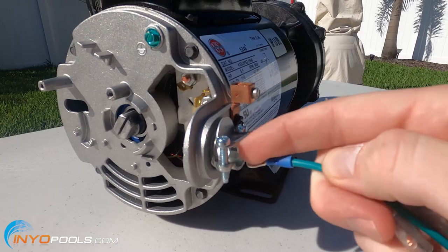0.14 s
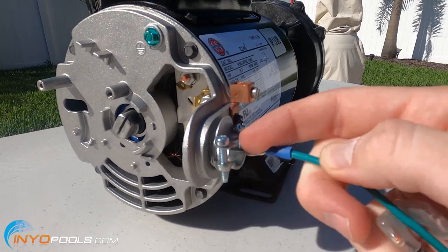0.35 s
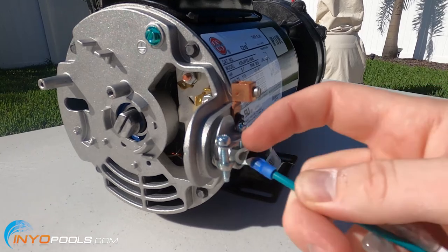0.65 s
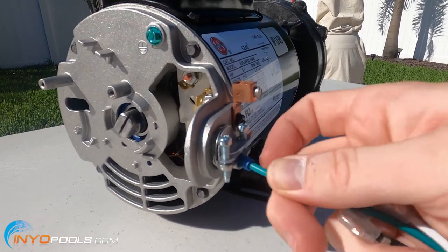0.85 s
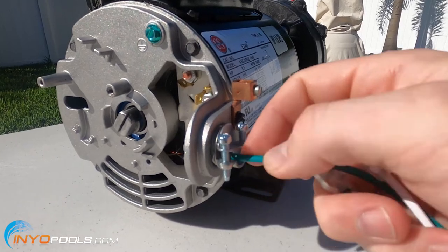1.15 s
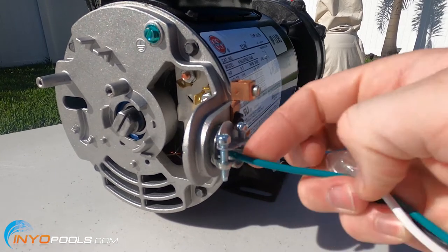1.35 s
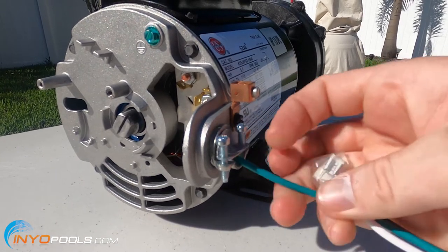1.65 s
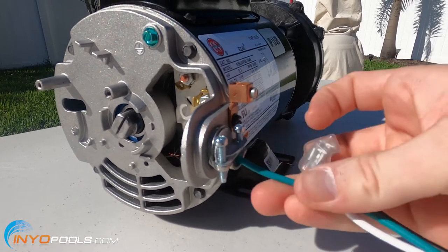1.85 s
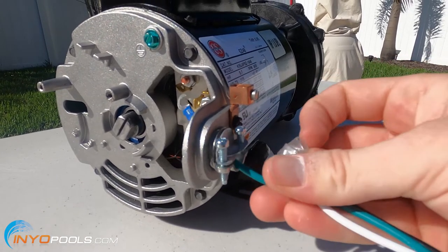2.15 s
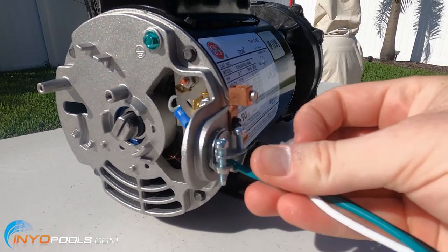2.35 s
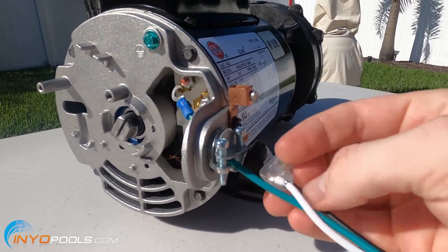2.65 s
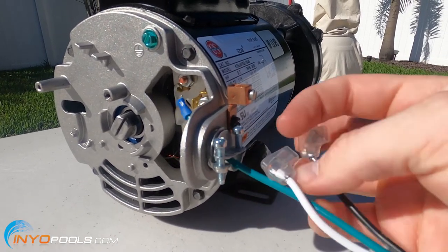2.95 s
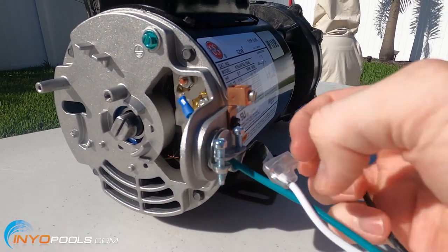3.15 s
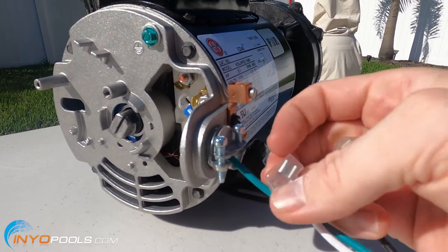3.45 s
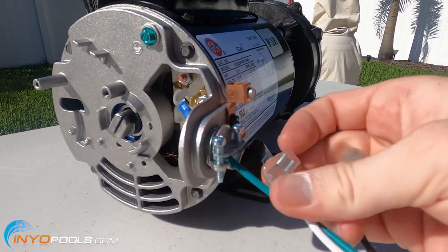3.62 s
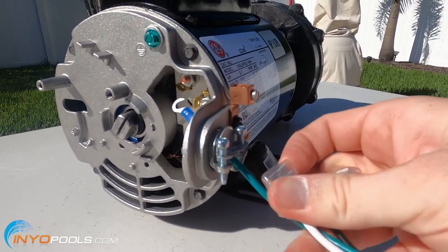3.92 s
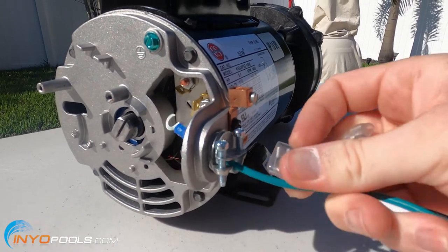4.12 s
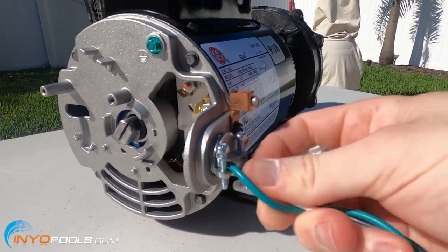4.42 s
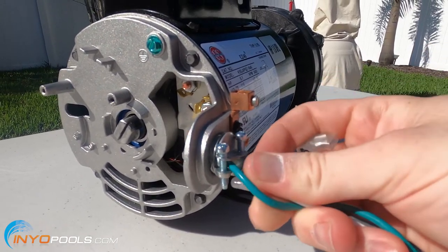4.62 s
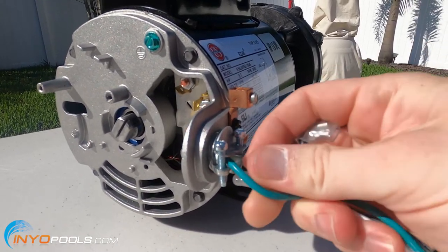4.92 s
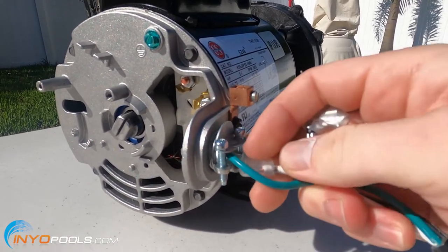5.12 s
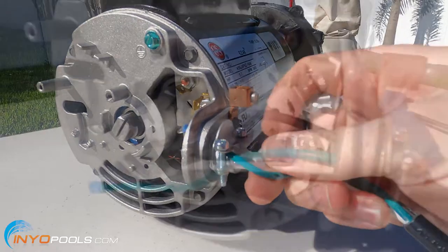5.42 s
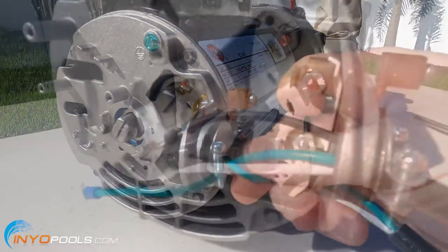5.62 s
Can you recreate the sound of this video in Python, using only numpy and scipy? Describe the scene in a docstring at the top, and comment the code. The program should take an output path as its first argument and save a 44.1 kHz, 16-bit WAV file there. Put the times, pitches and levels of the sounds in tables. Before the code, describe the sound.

Small metal terminals on wires click, scrape and rattle against a metal fitting outdoors, with faint bright pings over a low machine hum.

```python
"""Wires with crimp terminals are pushed through a steel conduit fitting on a cast motor housing, out of doors.
Each contact is a stutter of tiny impacts that rings the housing modes; the sliding wire ticks and rustles.
The metal sound shakes the loose lock nut, which also rings out in separate struck pings, mostly along with
contacts; table and hands scatter echoes. Behind this a distant machine hums and whines from sine waves, with
dull bumps, mostly low, and shaped noise for the low outdoor rumble, a drone and a soft hiss."""
import sys
import numpy as np
from scipy import signal
from scipy.fft import rfft, irfft, next_fast_len
from scipy.io import wavfile
from scipy.ndimage import uniform_filter1d, map_coordinates

SR = 44100
rng = np.random.default_rng(int(sys.argv[2]) if len(sys.argv) > 2 else 0)


def inscribe(sig):
    """Save sig as 16-bit PCM at rate SR to the path in sys.argv[1].

    A 1-D sig is mono; a 2-D sig holds one channel per row.
    Samples are clipped to [-1, 1] before scaling.
    """
    pcm = np.round(np.clip(np.atleast_2d(sig).T, -1, 1) * 32767)
    wavfile.write(sys.argv[1], SR, pcm.astype(np.int16))


N = 254456  # samples


def amp(db):
    """Decibels to linear gain."""
    return 10 ** (np.asarray(db) / 20)


def unit(x):
    """Scale to an rms of 1."""
    return x / np.sqrt(np.mean(x ** 2) + 1e-20)


def along(points, hz):
    """Read (frequency [Hz], value) points on a log frequency axis."""
    f, v = np.transpose(points)
    return np.interp(np.log(hz + 1), np.log(f + 1), v)


def curves(rows):
    """One value per sample for each column after the time."""
    s, *cols = np.transpose(rows)
    return [np.interp(np.arange(N) / SR, s, c) for c in cols]


def wobble(rate):
    """A smooth random curve, rate knots a second."""
    knots = rng.standard_normal(int(N * rate / SR) + 4)
    return map_coordinates(knots, [np.arange(N) * rate / SR])


def filtered(x, response, spare=8192):
    """x times a complex response of frequency, with spare samples of room for the tail."""
    n = x.shape[-1]
    m = next_fast_len(n + int(spare))
    return irfft(rfft(x, m) * response(np.fft.rfftfreq(m, 1 / SR)), m)[..., :n]


def ringing(modes, f):
    """Causal response of resonances (frequency [Hz], width [Hz], level [dB]), alternating in sign."""
    total = 0
    for k, (centre, width, db) in enumerate(modes):
        resonance = 1j * f * width / (centre ** 2 - f ** 2 + 1j * f * width)
        total = total + (-1) ** k * amp(db) * resonance
    return total


def add(track, s, sound):
    """Mix a sound in at a time in seconds."""
    part = track[..., round(s * SR):][..., :sound.shape[-1]]
    part += sound[..., :part.shape[-1]]


# Left-right likeness of the outdoor noise: (frequency [Hz], correlation [0-1])
LIKENESS = [(30, 0.77), (80, 0.93), (300, 0.95), (700, 0.84), (1500, 0.56), (4000, 0.35), (9000, 0.17)]


def rush(spectrum, patchy_db):
    """Stereo noise of rms 1, broken into time-frequency patches of random gain."""
    z = signal.stft(rng.standard_normal((2, N)), nperseg=512)[2]
    across_pitch = uniform_filter1d(rng.standard_normal(z.shape[1:]), 6, 0)
    patches = uniform_filter1d(across_pitch, 14, 1)
    pair = signal.istft(z * amp(patchy_db * unit(patches)), nperseg=512)[1][:, :N]

    def mid_side(hz):
        turn = np.arccos(np.clip(along(LIKENESS, hz), -1, 1)) / 2
        return amp(along(spectrum, hz)) * [np.cos(turn), np.sin(turn)]

    mid, side = filtered(pair, mid_side)
    return unit(np.array([mid + side, mid - side]))


# Outdoor mix: (time [s], rumble level [dB], drone level [dB], hiss level [dB])
OUTDOOR_LEVELS = [(0, -41.5, -47, -56), (1.5, -41.5, -43, -55.5), (2.3, -42, -45, -57),
                  (2.7, -44.5, -42.5, -57.5), (3.4, -39, -42.5, -57), (4.2, -41, -45.5, -57.5),
                  (5.77, -38.5, -41.5, -56)]
# Colour of each noise: (frequency [Hz], relative density [dB per Hz])
RUMBLE_COLOUR = [(10, -30), (22, -12.5), (50, 0.5), (75, -6), (110, -10.5), (200, -98)]
DRONE_COLOUR = [(60, -54), (85, 5.5), (110, -2.5), (150, -7), (250, -15), (400, -20.5), (600, -23.5),
                (1000, -63.5)]
HISS_COLOUR = [(350, -14.5), (600, -5.5), (1110, -3), (1300, -2), (1660, -5.5), (2170, -11), (3200, -14.5),
               (4470, -14.5), (5350, -19.5), (8500, -31.5), (10800, -30.5), (11600, -78)]


def outdoors():
    """Three shaped noises: lumpy rumble, a patchy drone and a soft hiss."""
    rumble_db, drone_db, hiss_db = curves(OUTDOOR_LEVELS)
    rumble = amp(rumble_db + 1.5 * wobble(7)) * rush(RUMBLE_COLOUR, patchy_db=1)
    drone = amp(drone_db) * rush(DRONE_COLOUR, patchy_db=1.56)
    hiss = amp(hiss_db) * rush(HISS_COLOUR, patchy_db=1.5)
    return rumble + drone + hiss


# Machine hum before its wobble: (time [s], rms level [dB])
HUM_LEVELS = [(0, -44.5), (.25, -38), (.7, -41), (1.15, -43), (1.6, -41), (2.2, -35.5), (2.6, -34),
              (3.1, -36.5), (3.4, -42), (3.65, -34.5), (4.3, -34), (4.7, -46.5), (5.2, -46.5),
              (5.77, -41.5)]
# Steady whine lines before their wobble: (frequency [Hz], rms level [dB])
WHINE_LINES = [(1182, -71.5), (1241, -73), (1359, -75.5)]


def machine(hum_hz=97.63):
    """Sine waves wavering in phase and level: a hum with a weak octave, and faint whine lines."""
    t = np.arange(N) / SR
    phase = 2 * np.pi * hum_hz * t + 1.29 * wobble(5)
    hum_gain = amp(curves(HUM_LEVELS)[0] + 0.67 * wobble(4.4))
    octave = amp(-24 + 0.87 * wobble(6.7)) * np.sin(2 * phase)
    hum = hum_gain * (np.sin(phase) + octave)
    whine = np.zeros(N)
    for hz, db in WHINE_LINES:
        gain = amp(db + 0.56 * wobble(4.95))
        whine += gain * np.sin(2 * np.pi * hz * t + 1.14 * wobble(6))
    return np.sqrt(2) * (hum + whine)  # a sine of rms 1 peaks at root 2


# Modes of fitting and housing at rest: (frequency [Hz], width [Hz], level [dB])
HOUSING_MODES = [(1560, 770, -8.5), (2254, 129, 3), (2695, 310, -6.5), (3128, 260, 9.5), (3515, 370, 9),
                 (3904, 202, 8), (4000, 203, 11), (4580, 69, 3), (5207, 250, 4), (6490, 520, -5.5),
                 (7060, 167, -2), (9340, 470, -1), (11050, 8300, -17), (12850, 200, -7)]
# The housing answers differently as wire fills the fitting:
# (time [s], low mode gain [dB], middle mode gain [dB], upper ring gain [dB])
FILLING = [(.3, -3, 1, -4), (.75, -3, -3.5, -4), (.9, 5.5, 2, -2.5), (1.25, 3.5, -2, -7.5),
           (1.5, -3, 1, -3.5), (1.9, 10, 3, -0.5), (2.33, 4, 0.5, 0), (2.8, -2, -1, -4),
           (3.1, 15.5, 8.5, 3), (4.15, 0, 0, 1.5), (4.5, 8.5, -6.5, -6), (4.8, 13.5, 2, 0),
           (5.1, 10.5, -5, 7), (5.6, 3.5, -6, -3)]
# For a while some modes sit higher:
# (lowest two from [s], group around 4 kHz from [s], both until [s], pitch [ratio])
RAISED_MODES = (3.0, 4.4, 4.65, 1.095)


def housing(s, bright_db=0):
    """The modes at a time: low, middle, upper ring and treble groups each have their own strength."""
    hz, width, level = np.transpose(HOUSING_MODES)
    when, *gains = np.transpose(FILLING)
    low_db, middle_db, ring_db = (np.interp(s, when, gain) for gain in gains)
    low_db = low_db - 0.25 * bright_db  # a duller contact knocks harder
    group = np.searchsorted([1900, 2850, 3880, 4850, 5800], hz)  # group edges in Hz
    colours = [low_db / 2, low_db, middle_db, 0, ring_db + bright_db, bright_db]
    low_from, four_khz_from, until, pitch = RAISED_MODES
    low_raised = (np.arange(len(hz)) < 2) & (low_from < s < until)
    four_khz_raised = (group == 3) & (four_khz_from < s < until)
    hz = np.where(low_raised | four_khz_raised, hz * pitch, hz)
    return np.array([hz, width, level + np.array(colours)[group]])


def rung(force, dry):
    """A running force through the changing housing, with a dry (Hz, width, dB) resonance; rms 1."""
    t = np.arange(N) / SR
    when = [row[0] for row in FILLING[::2]]
    total = np.zeros(N)
    for s, here in zip(when, np.eye(len(when))):
        def response(f):
            edge = ringing([dry], f) * np.clip(f / 2500, 0, 1)
            return ringing(housing(s).T, f) + edge
        voice = unit(filtered(force, response))
        total += np.sqrt(np.interp(t, when, here)) * voice  # crossfade between states
    return unit(total)


# The wire slides through the fitting: (start [s], end [s], level [dB])
WIRE_SLIDES = [(0.268, 0.362, -67), (0.763, 1.13, -59.5), (1.146, 1.257, -58.5), (1.313, 1.38, -62.5),
               (1.382, 1.93, -58.5), (2.27, 2.458, -65), (2.582, 3.03, -66), (3.53, 3.758, -62),
               (4, 4.394, -64), (4.79, 4.836, -47), (5.039, 5.167, -55), (5.61, 5.69, -61)]


def slides(edge_s=0.0034, dry_db=-17, ticks_per_s=180, tick_spread_db=6, rustle_db=-7):
    """While the wire slides, strands tick on the rim at random over a soft rustle."""
    t = np.arange(N) / SR
    level = np.zeros(N)
    for start, end, db in WIRE_SLIDES:
        level += amp(db) * np.clip(np.minimum(t - start, end - t) / edge_s, 0, 1)
    strength = amp(tick_spread_db * np.minimum(rng.exponential(size=N), 1.5))
    ticks = (rng.random(N) < ticks_per_s / SR) * strength
    bursts = signal.lfilter([1], [1, -.93], ticks) * rng.standard_normal(N)
    rustle = amp(rustle_db + 3.6 * wobble(30)) * rng.standard_normal(N)
    return level * rung(unit(bursts) + rustle, (7950, 5900, dry_db))


# Terminal against fitting: (time [s], peak level [dB], length [ms], brightness [dB])
TERMINAL_CONTACTS = [(0.2755, -38, 2.1, -5), (0.284, -43, 3.8, -15), (.299, -48, 6.5, -5),
                     (.312, -52, 4.4, -3), (0.3348, -44, 2.5, -2), (0.3974, -42, 3, 9),
                     (0.738, -30, 5.1, 10), (.747, -31.5, 11, 1.5), (0.7589, -35.5, 7.1, 7),
                     (.792, -45, 8, -5), (0.813, -40, 7.6, 8), (0.822, -47, 6.3, -25), (.832, -33, 7.7, 0),
                     (.848, -33, 5, 4.5), (0.858, -33, 9.2, 7), (0.877, -36.5, 6.9, 7),
                     (.889, -37.5, 7.1, 8), (0.904, -42.5, 24, 8), (0.976, -41, 14, 6.5),
                     (1.016, -41, 12.4, 12.5), (1.047, -56, 4, -11), (1.183, -49, 2.9, 9),
                     (1.2016, -44.5, 3.4, -1), (1.224, -33, 12.4, 8), (1.2878, -40.5, 0.46, -14),
                     (1.397, -38.5, 16, 2), (1.465, -45.5, 8.9, -2), (1.5065, -36, 4.5, 0),
                     (1.524, -44.5, 4, 6), (1.543, -37.5, 8.4, 5), (1.582, -36.5, 8, -1),
                     (1.589, -29.5, 4.2, 3), (1.6261, -26.5, 3.9, 5), (1.692, -46, 6, 1),
                     (1.701, -36.5, 6.4, 9), (1.72, -38.5, 8.2, -11), (1.731, -33, 10.5, 8.5),
                     (1.76, -48, 2.9, -4), (1.771, -44.5, 8.9, 14), (1.815, -43.5, 5.7, 9),
                     (1.8463, -44.5, 19, 7), (1.87, -33.5, 4, 14.5), (1.914, -45, 5.9, 10.5),
                     (1.996, -50, 12, 8.5), (2.2657, -36, 0.23, -12), (2.285, -52, 5.1, -1),
                     (2.305, -45, 11, 5), (2.326, -42, 7.5, 1), (2.342, -42, 7.2, 5), (2.41, -46, 4.3, 1.5),
                     (2.434, -50.5, 3.9, 0), (2.535, -43, 0.45, -20), (2.66, -45, 7.4, 4.5),
                     (2.797, -44, 3.5, 6), (2.914, -48.5, 7.6, 0), (2.942, -45.5, 8.7, 7.5),
                     (3.004, -55, 3, 10), (3.0868, -51.5, 4.4, 26), (3.0925, -43, 9.8, -11),
                     (3.107, -49, 19, -20), (3.525, -52.5, 6.1, 8), (3.572, -48, 4.9, 5.5),
                     (4.101, -46, 7.1, 8), (4.2125, -45.5, 4.4, 1), (4.299, -44, 7.9, 0),
                     (4.319, -39, 2.6, 0.5), (4.333, -41.5, 15, 3), (4.353, -39.5, 5.9, -0.5),
                     (4.427, -54.5, 1.5, 1), (4.485, -45.5, 4.1, 3), (4.521, -42.5, 7, 0),
                     (4.749, -44.5, 3.1, 0.5), (4.7905, -41, 12, 2), (4.811, -43.5, 31, 2.5),
                     (5.076, -44, 9.1, -3), (5.085, -35.5, 8.9, 6), (5.1, -40.5, 4, -1),
                     (5.1141, -29.5, 4.3, 4.5), (5.1255, -40, 13, 4), (5.137, -40.5, 2.9, 1.5),
                     (5.409, -38, 7.2, 3.5), (5.45, -43.5, 11, -1), (5.501, -51, 1.24, -28),
                     (5.537, -48, 1.6, -47), (5.6112, -53, 4.9, -20), (5.6298, -51, 4, 3),
                     (5.662, -48.5, 12, -31)]


def contacts(scatter_db=3.0, spiky_db=3, clump_db=3.0, detune=0.012, fizz_db=-26,
             attack_ms=0.065, lead_share=0.5, lead_db=-9):
    """Each contact is a stutter of tiny impacts that strikes the modes at new strengths."""
    track, lead = np.zeros(N), SR // 40
    ms = (np.arange(SR // 13) - lead) / SR * 1000
    grid = np.fft.rfftfreq(len(ms), 1 / SR)
    attack = 1 - (1 - amp(lead_db)) * np.exp(-np.abs(ms) / attack_ms)
    for s, db, length_ms, bright_db in TERMINAL_CONTACTS:
        # a faint rise leads into the sharp start, then the stutter dies away
        rise = amp(lead_db + 10 * ms / (lead_share * length_ms))
        decay = amp(-10 * (np.clip(ms, 0, None) / max(length_ms, .2)) ** 1.17)
        shape = np.where(ms < 0, rise, attack) * decay
        clumps = unit(uniform_filter1d(rng.standard_normal(len(ms)), size=SR // 500))
        impacts = rng.standard_normal(len(ms)) * amp(spiky_db * rng.standard_normal(len(ms)))
        force = shape * amp(clump_db * clumps) * impacts

        hz, width, level = housing(s, bright_db)
        chance = rng.standard_normal((2, len(hz)))
        hz = hz * (1 + detune * chance[0])
        # even out what the random force gives each mode, then scatter the strengths
        selectivity = 1 + (2 * (grid - hz[:, None]) / width[:, None]) ** 2
        reach = (np.abs(rfft(force)) ** 2 / selectivity / width[:, None]).sum(axis=1)
        struck_db = 10 * np.log10(reach / reach.mean())
        modes = np.transpose([hz, width, level - struck_db + scatter_db * chance[1]])

        def response(f):
            snap_gain = amp(min(-14 + 26 / length_ms ** 2, 14))  # the dry click leads in short taps
            click = ringing([(1800, 6500, -9), (4740, 880, 11.0)], f)
            snap = snap_gain * click / (1 + 1j * f / 8000) ** 2
            fizz = ringing([(10600, 35000, fizz_db + bright_db)], f)
            return ringing(modes, f) + snap + fizz

        hit = filtered(force, response, spare=512)
        top = np.sqrt(uniform_filter1d(hit ** 2, size=66).max())  # loudest 1.5 ms
        add(track, s - lead / SR, amp(db) * hit / top)
    return track


def drag(blows, settle_s=0.027, dry_db=-15):
    """After each contact the sliding wire chatters on the rim in uneven grains, following its energy."""
    keep = np.exp(-1 / (settle_s * SR))
    energy = signal.lfilter([1 - keep], [1, -keep], blows ** 2)
    activity = np.sqrt(energy + 1e-20)
    grains = rng.standard_normal(N) * amp(3 * wobble(90) + 4.5 * wobble(400))
    chatter = rung(grains, (5560, 4800, dry_db))
    return amp(-21.5) * activity ** 0.98 * chatter


# Modes of the lock nut: (frequency [Hz])
NUT_MODES = [8712, 10160, 13062, 13850]
# The lock nut is struck: (time [s], level [dB], favoured mode [index, between modes allowed], t60 [s])
NUT_PINGS = [(0.973, -43.5, 1, 0.084), (1.017, -48, 1.5, 0.1), (1.182, -45.5, 2, 0.11),
             (1.203, -48, 2, .11), (1.702, -40, -0.3, 0.5), (1.722, -29, 1.5, 0.19), (1.8, -50, -0.5, 0.09),
             (2.327, -50, 1, 0.1), (2.751, -54, 0, 0.08), (2.916, -59, 1, 0.17), (3.687, -50.5, 0, 0.097),
             (4.24, -45, -0.5, 0.065), (4.278, -49, 1, 0.19), (4.332, -38.5, 0, 0.048),
             (4.794, -50, 0, 0.11), (5.072, -49, 0, .15), (5.088, -40, 0, 0.11), (5.199, -50, 0.5, 0.08)]


def nut(shaken, pan_db=-6, width_hz=100, shake_db=-1, mode_fall_db=15, top_mode_db=-9):
    """The loose nut rings on four modes; the next ping stops the modes it favours at least as much."""
    shake = filtered(shaken, lambda f: ringing([(hz, width_hz, shake_db) for hz in NUT_MODES], f))
    pings = np.zeros(N)
    t = np.arange(SR // 4) / SR
    for ping, following in zip(NUT_PINGS, NUT_PINGS[1:] + NUT_PINGS[:1]):
        s, db, favoured, t60 = ping
        next_s, _, next_favoured, _ = following
        cut = np.clip((abs(next_s - s) + 0.003 - t) / .004, 0, 1)
        levels = db - mode_fall_db * np.abs(np.arange(3) - favoured)
        levels = [*levels, levels[-1] + top_mode_db]  # the fourth lies under the third
        for mode, (hz, level) in enumerate(zip(NUT_MODES, levels)):
            stopped = abs(mode - next_favoured) <= abs(mode - favoured)
            hold = (cut if stopped else 1) * (1 - np.exp(-t / 0.00062))
            shiver = np.cumsum(rng.normal(0, 0.025, len(t)))  # radians
            tone = np.sin(2 * np.pi * (hz * t + rng.random()) + shiver)
            add(pings, s, tone * amp(level - 60 * t / t60) * hold)
    ring = shake + pings * amp(2.6 * wobble(120))  # the level of the pings wavers at random
    return ring * amp([[pan_db / 2], [-pan_db / 2]])


# Answer of table and hands: (frequency [Hz], gain [dB])
ECHO_COLOUR = [(3000, -6.5), (10000, -6.5)]


def table(x, t60=0.041):
    """Short scattered echoes, different at each port, with a fresh random pattern fifteen times a second."""
    t, step = np.arange(SR // 20) / SR, SR // 15
    echoes = np.zeros((2, N))
    for start in range(0, N, step):
        tail = rng.standard_normal((2, len(t))) * amp(-60 * t / t60)
        tail = tail / np.linalg.norm(tail, axis=1, keepdims=True)
        add(echoes, start / SR, signal.fftconvolve(x[None, start:start + step], tail, axes=1))
    return filtered(echoes, lambda hz: amp(along(ECHO_COLOUR, hz)))


# Dull bumps, mostly low, and one short higher thud within a contact:
# (time [s], level [dB], frequency [Hz], boom t60 [s])
DULL_BUMPS = [(0.868, -38, 197, 0.089), (2.486, -45, 197, 0.44), (2.484, -44.5, 265, 0.98),
              (2.601, -47.5, 398, 0.89), (2.749, -45, 280, 0.4), (3.305, -36, 260, 0.17),
              (3.432, -42.5, 191.1, 0.89), (5.6295, -38.5, 1260, 0.025)]


def bumps():
    """Dull bumps: a puff of filtered noise with an unsteady, decaying sine boom."""
    track, t = np.zeros(N), np.arange(SR // 2) / SR
    for s, db, hz, t60 in DULL_BUMPS:
        noise = rng.standard_normal(len(t))
        puff = unit(filtered(noise, lambda f: ringing([(hz * 1.13, hz * 1.27, 0)], f) ** 2))
        puff = 0.63 * amp(-60 * t / min(2 * t60, .25)) * puff
        shiver = np.cumsum(rng.normal(0, .02, len(t)))  # radians
        boom = amp(-60 * t / t60) * np.sin(2 * np.pi * hz * t + shiver)
        onset = 1 - np.exp(-t / (0.025 * min(t60, .2)))
        add(track, s, amp(db) * onset * (boom + puff))
    return track


# Treble balance of the direct metal sound: (frequency [Hz], left minus right [dB])
SIDE_BALANCE = [(4400, 2), (8000, -5), (15000, -6.5)]


def scene():
    """The metal with its nut and echoes, over machine, bumps and outdoors a little stronger on the left."""
    blows = contacts()
    metal = blows + drag(blows) + slides()
    sides = np.array([[.5], [-.5]])  # half of a difference to each side
    ring = nut(metal)
    echoes = table(metal + ring.mean(axis=0))
    direct = filtered(metal, lambda hz: amp(sides * along(SIDE_BALANCE, hz)))
    leaning_left = (machine() + bumps() + outdoors()) * amp(sides * 1.2)
    return direct + ring + echoes + leaning_left


# Treble response of the microphone: (frequency [Hz], gain [dB])
MICROPHONE_TREBLE = [(12000, 1.5), (13500, -3.5), (16000, -18)]


def record(dry, lag_samples=1.14, top_hz=15900):
    """Sound reaches the right port first; the treble falls off up to the band limit."""
    def response(hz):
        lag = np.exp(-1j * np.pi * hz * lag_samples / SR * np.array([[1], [-1]]))
        return lag * amp(along(MICROPHONE_TREBLE, hz)) * (hz < top_hz)
    return filtered(dry, response)


dry = scene()
out = record(dry)
inscribe(out)
```